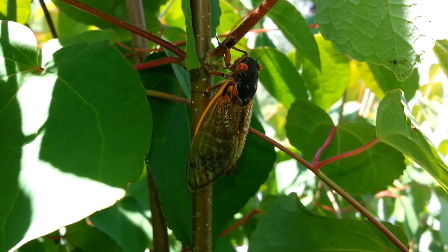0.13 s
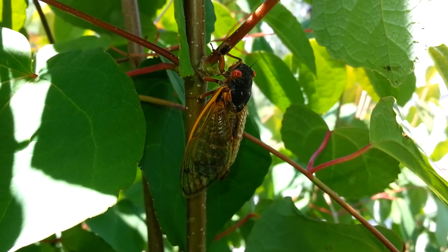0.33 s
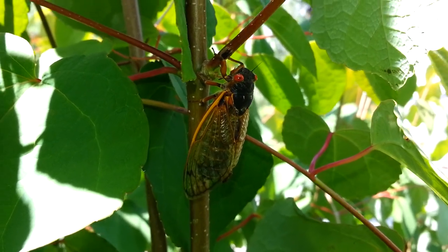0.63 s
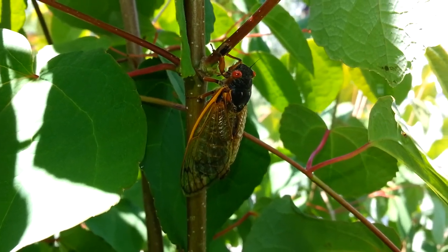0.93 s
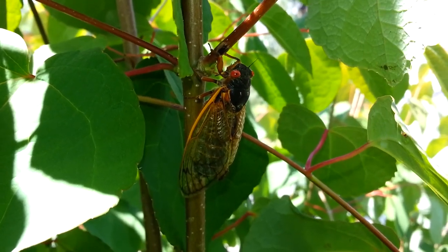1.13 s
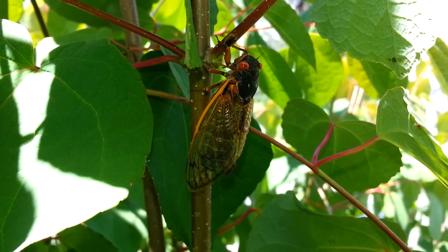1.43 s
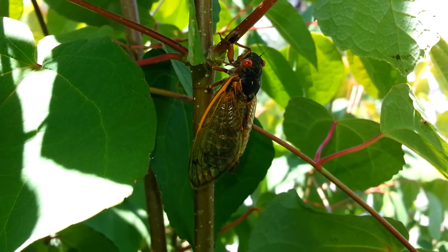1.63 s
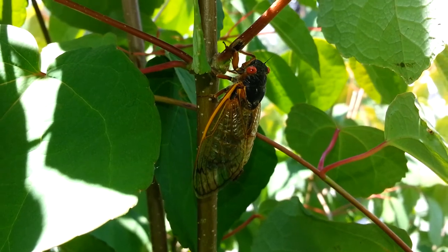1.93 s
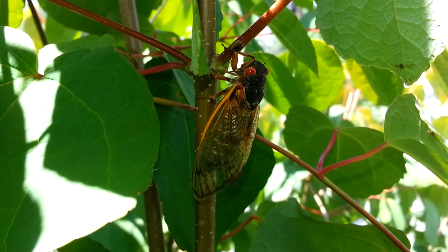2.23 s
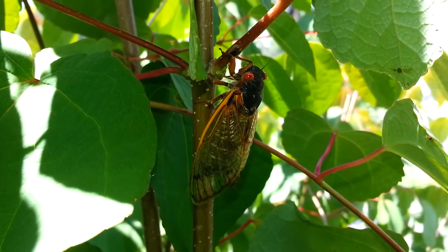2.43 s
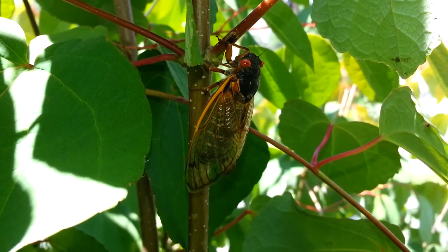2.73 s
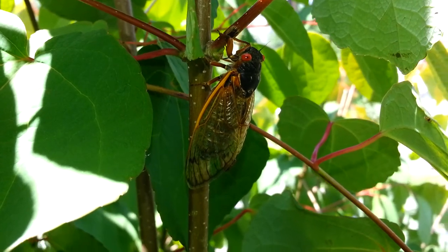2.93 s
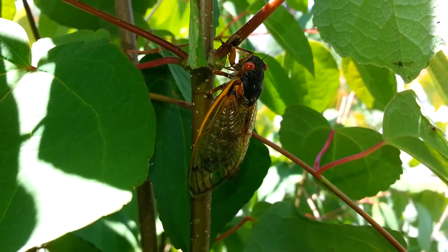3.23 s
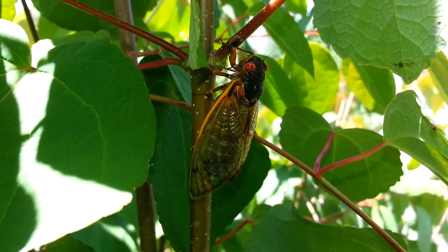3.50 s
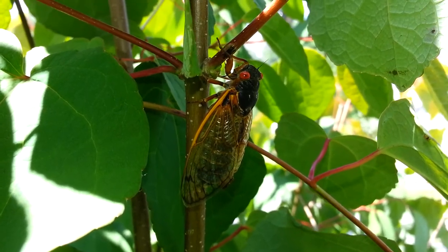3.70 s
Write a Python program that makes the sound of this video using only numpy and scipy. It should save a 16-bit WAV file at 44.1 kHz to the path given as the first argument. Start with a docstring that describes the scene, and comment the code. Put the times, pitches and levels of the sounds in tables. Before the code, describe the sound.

Close stereo capture among leaves: one cicada's hollow, raspy whine runs steadily, sags in pitch and stops; a pause exposes the droning chorus, faint hiss and low rumble before the call restarts.

```python
"""A periodical cicada on a twig close to the microphone. Its two tymbals buckle in turn, rib after rib,
and keep its hollow abdomen ringing. As the first call ends the abdomen slackens: the note slides down, fades
and stops; a second later it calls again. A few nearer neighbours stand out of a chorus droning in the trees,
made of coloured noise with hiss and a shriller buzz, over a low outdoor rumble.
The recorder's gain control eases up in the pause."""
import sys
import numpy as np
from scipy import signal
from scipy.fft import rfft, irfft, next_fast_len
from scipy.io import wavfile
from scipy.ndimage import uniform_filter1d, map_coordinates

SR = 44100
rng = np.random.default_rng(int(sys.argv[2]) if len(sys.argv) > 2 else 0)


def generate_wav(sig):
    """Save sig (samples, or channels by samples) to the path in sys.argv[1] as 16-bit PCM at SR."""
    pcm = np.round(np.clip(np.atleast_2d(sig).T, -1, 1) * 32767).astype(np.int16)
    wavfile.write(sys.argv[1], SR, pcm)


N = 170226

# The cicada's calls: start_s, end_s
CALLS = [(-.2, 2.262), (3.317, 4.1)]
# Ringing pitch of the abdomen: time_s, pitch_hz
ABDOMEN_PITCH = [(0, 1299), (1.85, 1291), (1.885, 1257), (1.92, 1044), (1.95, 919), (2.0, 852), (2.08, 843),
                 (2.2, 840), (2.26, 858.6), (3.32, 1245), (3.4, 1268), (3.5, 1307), (3.86, 1289)]
# Colour of a rib click with the abdomen taut: frequency_hz, left_db, right_db
TAUT_CLICK_COLOUR = [(870, -24, 31), (2000, -4, -0.5), (2330, -12.5, -9), (2695, -3, -3),
                     (3100, -23.5, -17), (3520, -7.5, -8.5), (4556, -1, -0.5), (4440, -14.5, -9),
                     (5150, -12, -8.5), (6360, -28, -13), (6920, -14, -11), (8750, -14, -4),
                     (8900, -14.5, -3.5), (9450, -20.5, -8.5), (10200, -21, -12.5), (14200, -37.5, -20.5)]
# Colour of a rib click with the abdomen slack: frequency_hz, left_db, right_db
SLACK_CLICK_COLOUR = [(900, -35, -8), (2000, -15, -18), (2920, -4, -4), (4020, -10, -8), (4400, 9, 11),
                      (4400, 8, 5), (4800, -9, -8), (6560, -24, -12.5), (8400, -39, -14),
                      (10600, -41, -20.5), (14100, -25, -25)]
# Phase of the cicada at the left microphone port against the right: frequency_hz, phase_rad
PORT_PHASE_CURVE = [(0, 1.5), (1300, -1.39), (3150, -2.5), (3850, -6), (4400, -2.5), (5300, -6), (8000, -8),
                    (8900, -12.5), (14000, -25)]
# Centre pitches of the nearer members of the chorus: pitch_hz
NEIGHBOUR_PITCHES = [1255, 1302, 1345, 1367]
# Colour of the chorus drone: frequency_hz, level_db
CHORUS_COLOUR = [(380, -54), (650, -31.5), (856, -20), (1020, -23), (1120, -13.5), (1270, -7.5),
                 (1340, -4.5), (1410, -6.5), (1440, -11.5), (1530, -22.5), (1600, -23.5), (2100, -39.5),
                 (2730, -69), (4620, -120)]
# Colour of the far insects and leaves: frequency_hz, level_db
HISS_COLOUR = [(1060, -8), (1800, 3), (1960, -2.5), (2350, 1), (3690, -5.5), (3990, -1), (5090, -5),
               (6100, -9.5), (6950, -14.5), (7580, -10), (11000, -16.5), (14300, -17.5)]
# Colour of a shriller insect: frequency_hz, level_db
SHRILL_COLOUR = [(3500, -16), (4700, -13), (5500, 2), (5900, -10), (6600, -22)]
# Loudness of the shriller insect: time_s, level_db
SHRILL_LEVEL = [(0, -48), (2.75, -63), (3.2, -54.5), (3.86, -54)]
# Colour of the outdoor rumble: frequency_hz, level_db
RUMBLE_COLOUR = [(15, -53), (25, -23), (38, -25.5), (86, -1.5), (119, -3), (231, 1.5), (347, -3.5),
                 (382, 0.5), (416, -5.5), (536, -3.5), (720, -13), (940, -41), (1580, -120)]
# Left-right likeness of the rumble: frequency_hz, correlation
RUMBLE_LIKENESS = [(60, 0.98), (130, 0.93), (280, 0.82), (620, 0.62)]

# Levels are those ahead of the gain control.
# Tension: pitch with the abdomen taut and slack, stroke rate of both tymbals together
TAUT_HZ, SLACK_HZ = 1299, 821.7
STROKES_TAUT_HZ, STROKES_SLACK_HZ = 165.1, 177.6
PITCH_WAVER = .008  # unsteadiness, as a share of the pitch

# Call envelope, and extra effort just after a call starts: size, delay, width
ATTACK_S, RELEASE_S = .004, .0063
PUSH_DB, PUSH_AT_S, PUSH_S = 2.5, .059, .074

# Ring of the abdomen
RING_TAUT_DB, RING_SLACK_DB = -17, -29
RING_S = .0009  # memory of the abdomen
PAN_DB = -.7  # left gain, opposite on the right: the ring sits a little to the right
STROKE_DB = .6  # size scatter of the strokes
SWELL_TAUT, SWELL_SLACK = .18, .38  # swell within a stroke, as a share of the ring
SLACK_GRAIN = .2  # uneven rib strength in the low note
SCATTER_RAD, DRIFT_RAD = .62, .16  # phase scatter from stroke to stroke, and its drift
SLACK_ROUGH = .55  # share of scatter and drift left in the low note
FLUTTER_RAD = .25  # phase flutter from rib to rib
BEND_RAD = .31  # pitch bend within a taut stroke
SHIFT_RAD, SHIFT_SAG_RAD = .25, .65  # between taut and slack: extra scatter, pitch sag as a stroke swells
SLACK_LIFT_RAD = .22  # when slack the pitch lifts as the stroke swells
SLIP_SHARE, SLIP_DEPTH = .08, .7  # share of strokes that misfire, how far the taut ring dips then
SLIP_RAD = 1.4  # typical step out of phase after a taut misfire

# Rib clicks
RIBS_TAUT_DB, RIBS_SLACK_DB = -39.5, -42.5
RIB_SCATTER_DB, RIB_JITTER_S, RIB_SWELL_DB = 2.5, .00012, 3
WEAK_TYMBAL_DB, SLIP_CLICK_DB = -5, 2.5  # with the abdomen taut
LEAVES_DB, LEAVES_S, LEAVES_HZ = -3.5, .0071, 3170  # foliage scatter: level, decay time, lower edge

# Neighbours and chorus
NEIGHBOUR_DB, NEIGHBOUR_SWAY_DB, NEIGHBOUR_WANDER_HZ = -43.5, 4, 14
CHORUS_DB, CHORUS_SWAY_DB, CHORUS_LIKENESS = -32.5, 1, -.047
HISS_DB, RUMBLE_DB = -48.5, -47.5

# Recorder: threshold, share of the dB excess removed, reaction time; band limit
AGC_DB, AGC_SLOPE, AGC_S = -22.5, .37, .047
TOP_HZ = 14450


def amp(db):
    """Decibels to amplitude."""
    return 10 ** (np.asarray(db) / 20)


def unit(x):
    """Scale to an rms of 1."""
    return x / np.sqrt(np.mean(np.abs(x) ** 2) + 1e-20)


def along(points, hz, axis=1):
    """One column of a table, read on a log frequency axis."""
    p = np.asarray(points, float)
    return np.interp(np.log(hz + 1), np.log(p[:, 0] + 1), p[:, axis])


def curve(rows):
    """(time_s, value) rows, one value per sample."""
    return np.interp(np.arange(N) / SR, *np.transpose(rows))


def wobble(rate):
    """A smooth random curve, rate knots a second."""
    knots = rng.standard_normal(int(N * rate / SR) + 4)
    return map_coordinates(knots, [np.arange(N) * rate / SR])


def filtered(x, response):
    """x shaped by a response of frequency."""
    m = next_fast_len(N + SR // 2)
    return irfft(rfft(x, m) * response(np.fft.rfftfreq(m, 1 / SR)), m)[..., :N]


def lagged(x, seconds):
    """One-pole smoothing that starts settled."""
    k = np.exp(-1 / (seconds * SR))
    settled = [k * x[:SR // 20].mean()]
    return signal.lfilter([1 - k], [1, -k], x, zi=settled)[0]


def rush(spectrum, likeness):
    """Stereo noise of rms 1; the mid-side balance sets its left-right likeness."""
    def mid_side_colour(hz):
        turn = np.arccos(np.clip(along(likeness, hz), -1, 1)) / 2
        return amp(along(spectrum, hz)) * [np.cos(turn), np.sin(turn)]

    mid, side = filtered(rng.standard_normal((2, N)), mid_side_colour)
    return unit(np.array([mid + side, mid - side]))


def abdomen(cycles, strokes, slips, slack):
    """Hollow resonance: each stroke drives it anew, a little out of step; a misfire makes it dip."""
    k = strokes.astype(int)
    size, scatter, drift, jump = rng.standard_normal((len(slips), 4)).T
    rough = 1 + slack * (SLACK_ROUGH - 1)
    shifting = np.sin(np.pi * slack)  # peaks halfway between taut and slack
    turn = 2 * np.pi * strokes
    misfire = slips[k] * (1 - slack) * np.sin(turn / 2) ** 2

    stroke_scatter = np.interp(strokes, np.arange(len(scatter)), scatter)
    phase = (rough * SCATTER_RAD + shifting * SHIFT_RAD) * stroke_scatter
    phase += FLUTTER_RAD * wobble(700)
    phase += (1 - slack) * BEND_RAD * np.sin(turn)
    phase += (shifting * SHIFT_SAG_RAD - slack * SLACK_LIFT_RAD) * np.cos(turn)
    phase += DRIFT_RAD * np.cumsum(rough * drift[k] * np.diff(k, prepend=0))
    phase += SLIP_RAD * np.cumsum(2 * misfire * jump[k] * np.diff(strokes, prepend=0))
    phase = uniform_filter1d(phase, size=20)

    swell_depth = SWELL_TAUT + slack * (SWELL_SLACK - SWELL_TAUT)
    swell = 1 + swell_depth * np.sin(turn) + slack * SLACK_GRAIN * wobble(600)
    strength = swell * (1 - SLIP_DEPTH * misfire) * amp(STROKE_DB * size[k])
    drive = strength * np.exp(1j * phase)
    ring = unit(np.real(lagged(drive, RING_S) * np.exp(2j * np.pi * cycles)))
    return ring * amp(RING_TAUT_DB + slack * (RING_SLACK_DB - RING_TAUT_DB))


def ribs(cycles, strokes, slips, slack, singing):
    """One rib snaps per ring cycle, swelling within each stroke; when taut, one tymbal is louder."""
    at = np.flatnonzero(np.diff(np.floor(cycles)))
    size, jitter = rng.standard_normal((len(at), 2)).T
    k = strokes[at].astype(int)
    db = RIB_SCATTER_DB * size + RIB_SWELL_DB * np.sin(2 * np.pi * strokes[at])
    db += (1 - slack[at]) * (WEAK_TYMBAL_DB * (k % 2) + SLIP_CLICK_DB * slips[k])
    snap_at = at + np.round(RIB_JITTER_S * SR * jitter).astype(int)
    snaps = np.bincount(np.clip(snap_at, 0, N - 1), amp(db), N)

    # Foliage smears the clicks into decaying noise, mostly high
    scattered = np.sqrt(lagged(snaps ** 2, LEAVES_S)) * rng.standard_normal((2, N))
    scattered = filtered(scattered, lambda hz: hz ** 2 / np.hypot(hz ** 2, LEAVES_HZ ** 2))
    heard = snaps + amp(LEAVES_DB) * scattered
    heard = filtered(heard, lambda hz: 1 / (1 + (1700 / (hz + 1)) ** 8))  # steep low cut

    def coloured(table):
        return unit(filtered(heard, lambda hz: amp([along(table, hz, axis=1), along(table, hz, axis=2)])))

    taut_clicks = amp(RIBS_TAUT_DB) * np.sqrt(1 - slack) * coloured(TAUT_CLICK_COLOUR)
    slack_clicks = amp(RIBS_SLACK_DB) * np.sqrt(slack) * coloured(SLACK_CLICK_COLOUR)
    return singing * (taut_clicks + slack_clicks)


def cicada():
    """The slackness of the abdomen, read from its pitch, sets loudness, stroke rate and click colour."""
    t = np.arange(N) / SR
    pitch = curve(ABDOMEN_PITCH)
    slack = np.clip((TAUT_HZ - pitch) / (TAUT_HZ - SLACK_HZ), 0, 1)

    singing, push = np.zeros(N), np.zeros(N)
    for start, end in CALLS:
        singing += np.clip((t - start) / ATTACK_S, 0, 1) * np.clip(1 - (t - end) / RELEASE_S, 0, 1)
        push += np.exp(-((t - start - PUSH_AT_S) / PUSH_S) ** 2)
    singing = singing * amp(PUSH_DB * push)

    cycles = np.cumsum(pitch * (1 + PITCH_WAVER * wobble(35))) / SR
    stroke_rate = STROKES_TAUT_HZ + slack * (STROKES_SLACK_HZ - STROKES_TAUT_HZ)
    strokes = np.cumsum(stroke_rate * (1 + .008 * wobble(15))) / SR
    slips = rng.random(size=1000) < SLIP_SHARE  # one entry per stroke, with some to spare

    ring = singing * abdomen(cycles, strokes, slips, slack) * amp([[PAN_DB], [-PAN_DB]])
    sound = ring + ribs(cycles, strokes, slips, slack, singing)

    def port_shift(hz):
        phase = np.interp(hz, *np.transpose(PORT_PHASE_CURVE))
        return np.exp(1j * phase * np.array([[.5], [-.5]]))

    return filtered(sound, port_shift)


def neighbours():
    """Nearer cicadas are wandering, swaying sine strands, each with its own left-right phase."""
    out = np.zeros((2, N))
    for hz in NEIGHBOUR_PITCHES:
        pitch = hz + NEIGHBOUR_WANDER_HZ * wobble(14)
        phase = 2 * np.pi * np.cumsum(pitch) / SR + SCATTER_RAD * wobble(STROKES_TAUT_HZ)
        direction = rng.uniform(-np.pi, np.pi) * np.array([[.5], [-.5]])
        out += unit(amp(NEIGHBOUR_SWAY_DB * wobble(8.8)) * np.sin(phase + direction))
    return amp(NEIGHBOUR_DB) * out


def chorus():
    """Many far cicadas merge into one swaying noise drone, with hiss and a shriller buzz above it."""
    sway = amp(CHORUS_DB + CHORUS_SWAY_DB * wobble(7.15))
    drone = sway * rush(CHORUS_COLOUR, [(1300, CHORUS_LIKENESS)])
    shrill = amp(curve(SHRILL_LEVEL)) * rush(SHRILL_COLOUR, [(5000, 0)])
    hiss = amp(HISS_DB) * rush(HISS_COLOUR, [(5000, .01)])
    return drone + shrill + hiss


def outdoors():
    """Distant rumble; its long, low waves reach both ports more alike the lower they are."""
    return amp(RUMBLE_DB) * rush(RUMBLE_COLOUR, RUMBLE_LIKENESS)


def scene():
    """The close cicada over its neighbours, the chorus and the rumble."""
    return cicada() + neighbours() + chorus() + outdoors()


def record(dry):
    """Gain control turns the loud call down; the band limit follows."""
    power = lagged(np.mean(dry ** 2, axis=0), AGC_S)
    gain = (1 + power / amp(AGC_DB) ** 2) ** (-AGC_SLOPE / 2)
    return filtered(dry * gain, lambda hz: hz < TOP_HZ)


dry = scene()
out = record(dry)
generate_wav(out)
```